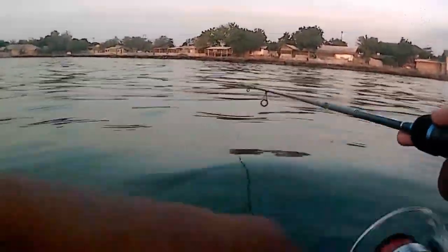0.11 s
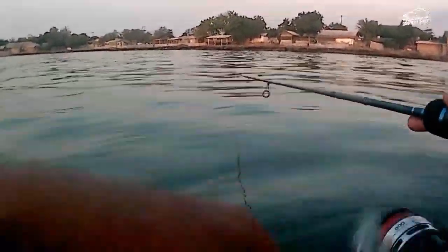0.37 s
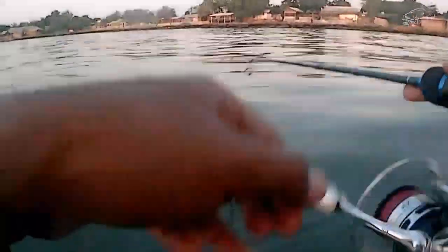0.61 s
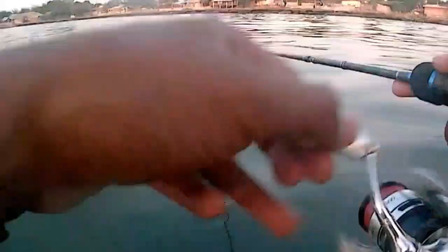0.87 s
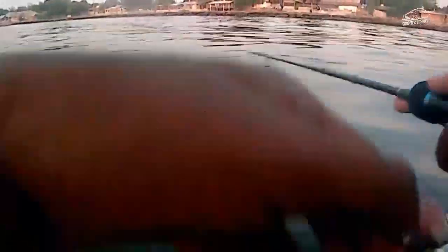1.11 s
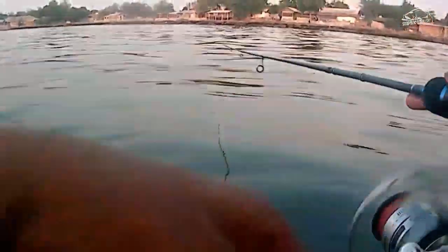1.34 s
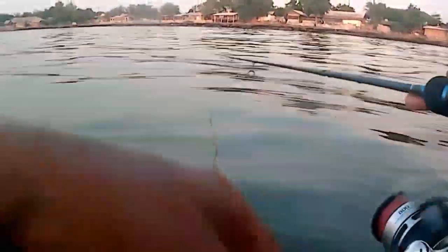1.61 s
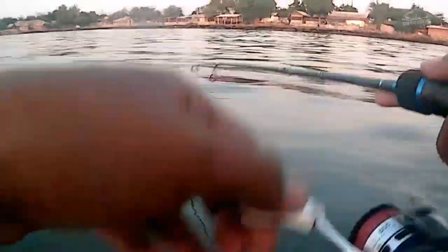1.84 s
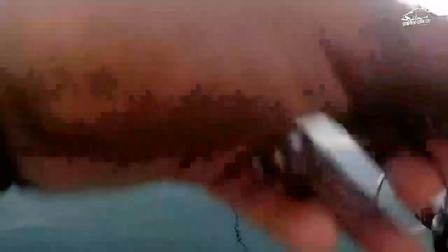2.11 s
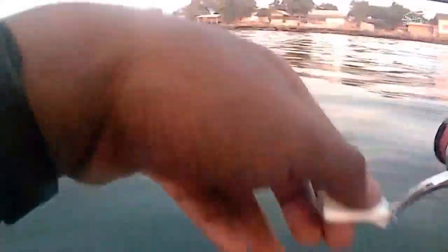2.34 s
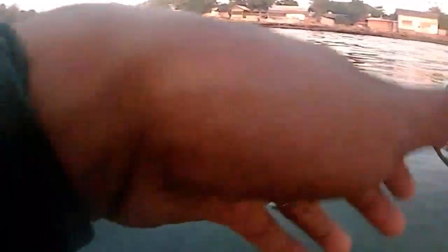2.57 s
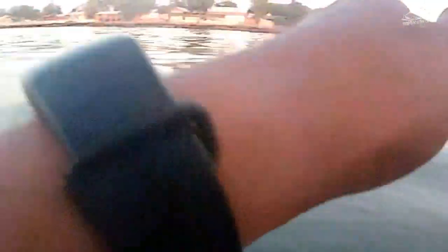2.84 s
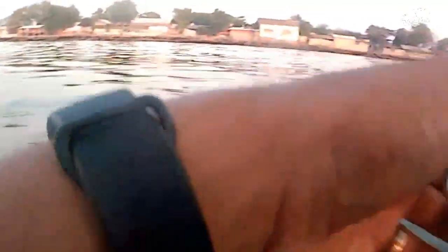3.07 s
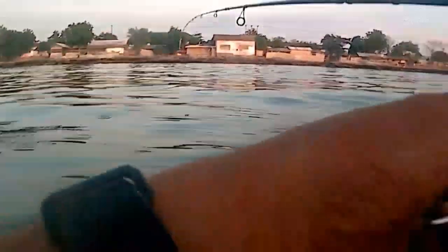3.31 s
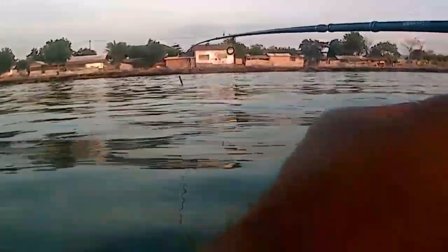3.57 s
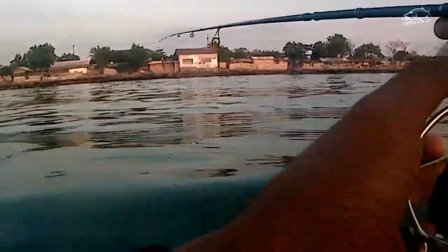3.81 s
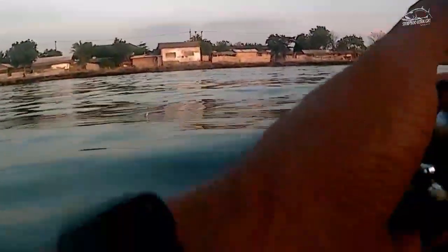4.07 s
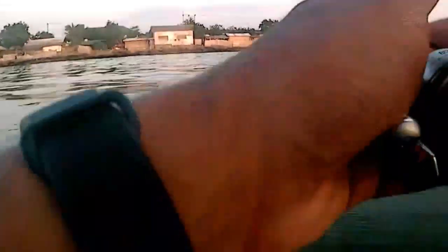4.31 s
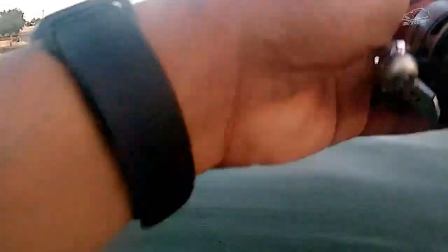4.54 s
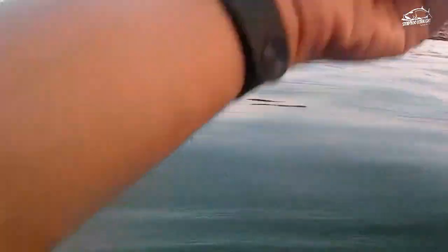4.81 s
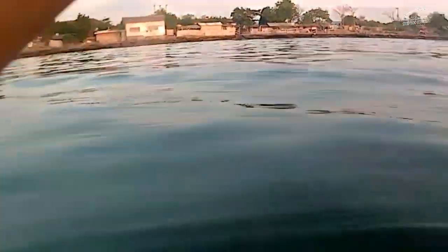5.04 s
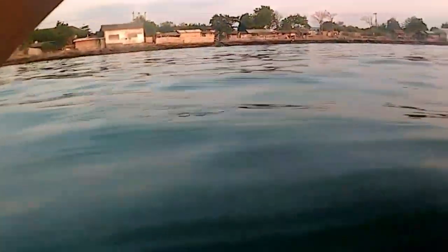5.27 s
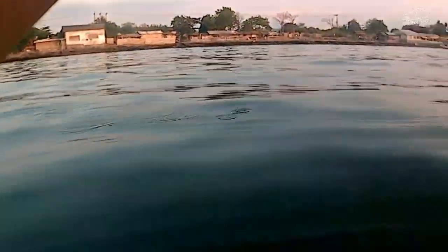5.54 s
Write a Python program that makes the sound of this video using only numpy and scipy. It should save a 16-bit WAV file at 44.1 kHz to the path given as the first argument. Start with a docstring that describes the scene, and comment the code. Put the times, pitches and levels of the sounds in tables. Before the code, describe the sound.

Very close, muffled, single-channel sound: slow bassy heartbeats, a little more than one per second, with dull low hiss and a faint rumble. One barely audible tick comes early. Midway, several dry hollow plastic knocks hit hard and distort, ending in a dense scraping clatter, with rough hiss and muffled gaps around them. Afterwards the soft thumping continues undisturbed.

```python
"""On calm water, an angler wears a small camera in a sealed case on the chest.
The heartbeat thumps through the case as swelling low sines, over a dull hiss of shaped noise.
Rod and reel knock, rattle and creak against the case: clicks set its modes ringing, and slips rasp.
Loud sounds overload the input. Around the knocks a rough hiss swells or the treble drops out in steps."""
import sys
import numpy as np
from scipy import signal
from scipy.fft import rfft, irfft
from scipy.io import wavfile

SR = 44100
rng = np.random.default_rng(int(sys.argv[2]) if len(sys.argv) > 2 else 0)


def dump_mix(stems):
    """Bounce the given channels to the path in sys.argv[1] as a 16-bit WAV at rate SR."""
    frames = np.atleast_2d(stems).T  # one column per channel
    limited = np.clip(frames, -1, 1)  # hard clip at full scale
    pcm = np.round(limited * 32767).astype(np.int16)
    wavfile.write(sys.argv[1], SR, pcm)


def convert_level_to_amplitude(level_db):
    """Map a level in decibels to its linear amplitude factor."""
    exponent = np.asarray(level_db, float) / 20
    return 10 ** exponent


N = 249385  # length in samples

# Knocks on the case. Each row: start in seconds, blow strength in dB, place along the case from 0 to 1,
# hardness in dB per mode group (a harder blow favours the higher groups).
KNOCKS = [(1.173, -40.5, .26, -0.7), (3.205, 3, .48, 0.24), (3.2212, -8.5, .48, 0.6),
          (3.4246, 2, 0.33, -0.34), (3.7027, -2, .43, 5), (3.731, -22, 0.37, -3), (3.867, 1.5, 0.38, 6.5),
          (4.006, -1, 0.41, 7), (4.045, -4, 0.3, 3), (4.09, -23.5, 0.26, 2), (4.1, -23, .38, 3.5),
          (4.124, -16.5, .4, 7), (4.137, -12, 0.48, 2.5)]
# Ringing modes of the case: five groups from low to high, then the thud that any blow sets off.
# Each row in a group: frequency in Hz, relative level in dB, time to die away by 60 dB in seconds.
CASE_MODES = [
    [(478, -17, 0.073), (607, -2.5, .045)],
    [(789, 2, 0.03)],
    [(935, -0.5, 0.029), (1150, -4, .03)],
    [(1310.7, 1, 0.029), (1568, -5, 0.031)],
    [(1888, -1, 0.014), (2134, -3.5, 0.014), (2843, -9.5, 0.016), (3180, -15.5, 0.027)],
    [(127, -13, 0.031), (207, -10, 0.037), (296, -10, 0.023)],
]
# Times when the treble drops out. Each row: start in seconds, end in seconds, lowest upper edge in Hz,
# sinking in octaves per step, level in dB of the hum under the edge.
DROPOUTS = [(3.22, 3.407, 150, 1.08, -59), (3.577, 3.678, 850, 5.8, -47), (3.721, 3.838, 500, 1.47, -47.5),
            (3.897, 3.982, 300, 1.34, -55), (4.151, 4.208, 150, 1.8, -58)]
# Rise in seconds and fade in dB per second, for the hiss around knocks and the hum in dropouts.
HALO_RISE_S, HALO_FADE_DB_PER_S = 0.018, 1199.5


def rms_one(x):
    """Scales a sound to an average strength (rms) of 1."""
    return x / np.sqrt(np.mean(x ** 2) + 1e-20)


def in_time(rows):
    """Joins table rows by straight lines in time, giving one curve per column."""
    seconds, *columns = np.transpose(rows)
    return [np.interp(np.arange(N) / SR, seconds, column) for column in columns]


def band(x, low_hz, high_hz, order=2):
    """Keeps mainly the sound between two frequencies."""
    sos = signal.butter(order, [low_hz, high_hz], "band", fs=SR, output="sos")
    return signal.sosfilt(sos, x)


def ring(clicks, hz, t60):
    """A unit click sets a sine of height 1 ringing; it dies by 60 dB in t60 seconds."""
    decay = convert_level_to_amplitude(-60 / (t60 * SR))  # per sample
    turn = 2 * np.pi * hz / SR  # radians per sample
    return signal.lfilter([0, np.sin(turn)], [1, -2 * decay * np.cos(turn), decay * decay], clicks + 1e-18)


def held(start, length, db, attack, fade_db_per_s):
    """Gain that rises, holds and fades at a steady rate."""
    since_start = np.arange(N) / SR - start
    rise = np.clip(since_start / attack, 0, 1)
    return rise * convert_level_to_amplitude(db - fade_db_per_s * np.clip(since_start - length, 0, 1))


def add_soft_blow(out, start, height, hz, swell):
    """Adds a soft blow: a low sine that swells and dies."""
    t = np.arange(int(10 * swell * SR)) / SR
    envelope = height * t / swell * np.exp(1 - t / swell)
    wave = envelope * np.sin(2 * np.pi * hz * t)
    i = round(start * SR)
    out[i:i + len(t)] += wave[:N - i]


def hiss():
    """Steady dull hiss with a hump at the case's main mode: white noise with its spectrum shaped."""
    # Each row: frequency in Hz, relative noise density in dB per Hz.
    hiss_colour = [(60, -7.5), (96, -11.5), (250, -15.5), (328, -16), (918, -27), (1160, -26), (1340, -22),
                   (1520, -28.5), (3080, -37), (3490, -43), (3970, -72.5)]
    hz = np.fft.rfftfreq(N, 1 / SR)
    table_hz, db = np.transpose(hiss_colour)
    colour = convert_level_to_amplitude(np.interp(np.log(hz + 1), np.log(table_hz), db, left=-60, right=-90))
    return convert_level_to_amplitude(-46.5) * rms_one(irfft(rfft(rng.standard_normal(N)) * colour, N))


def chest():
    """Valve closures swing the chest modes; arm movements push the case; muscles rumble."""
    # First heart sounds. Each row: time in seconds, thump in dB,
    # then chest sway and second valve in dB against the thump.
    first_sounds = [(.358, -12, .5, -3), (1.093, -15.5, 4, 4), (1.852, -13, -0.5, 0.5),
                    (2.615, -13.5, -.5, -1), (3.359, -7, -5, -30.5), (4.1, -8, -5, -21),
                    (4.846, -12.5, 0.5, -9), (5.574, -11.5, -2.5, -9)]
    # Second heart sounds. Each row: time in seconds, thump in dB.
    second_sounds = [(0.618, -18), (1.355, -17.5), (2.111, -16), (2.872, -19), (3.607, -17), (4.355, -20),
                     (5.105, -18)]
    # Chest modes, in the order thump, sway, second valve (first sounds only), snap.
    # Each row: frequency in Hz, start in seconds after the beat (minus is before), swell in seconds.
    first_modes = [(42.4, -.019, 0.007), (19.4, -.032, 0.035), (45, .008, 0.0068), (85, -.009, 0.0068)]
    second_modes = [(41, -.018, .013), (21, .0, .026), (85, -.009, .007)]
    # Slow pushes on the case. Each row: start in seconds, signed height, frequency in Hz, swell in seconds.
    pushes = [(3.213, .2, 25, .008), (3.707, -.4, 50, .008), (3.876, .5, 36, .009), (3.899, -.2, 50, .006),
              (4.008, -.35, 45, .006), (4.064, 2.0, 17, .012), (4.108, .45, 12, .025),
              (4.146, -.62, 12, .014)]
    # Muscle rumble, joined by straight lines. Each row: time in seconds, level in dB.
    rumble_level = [(0, -34), (1.2, -29.5), (2.4, -36), (3.5, -28.5), (3.95, -36), (4.09, -15), (4.4, -37),
                    (4.8, -29.5), (5.65, -34)]

    first_snap_db, second_sway_db, second_snap_db = -12.5, -3, -14.5  # against the thump
    first = [(s, db, [0, sway_db, valve_db, first_snap_db]) for s, db, sway_db, valve_db in first_sounds]
    second = [(s, db, [0, second_sway_db, second_snap_db]) for s, db in second_sounds]
    out = np.zeros(N)
    for beats, modes in ((first, first_modes), (second, second_modes)):
        for s, thump_db, shares_db in beats:
            for share_db, (hz, delay, swell) in zip(shares_db, modes):
                add_soft_blow(out, s + delay, convert_level_to_amplitude(thump_db + share_db), hz, swell)
    for push in pushes:
        add_soft_blow(out, *push)
    # One extra second of noise lets the filter settle first.
    rumble = band(rng.standard_normal(N + SR), 10, 32)[SR:]
    return out + convert_level_to_amplitude(in_time(rumble_level)[0]) * rms_one(rumble)


def knock_hiss():
    """Rough mid-band noise around each knock, and narrow noise humming under the edge in dropouts."""
    lead_s, hold_s = 0.025, 0.02  # before and after the start of the knock
    level_db = -32  # against the blow, before hardness
    per_hardness = 1.4  # dB of hiss per dB of hardness
    halos = [held(s - lead_s, lead_s + hold_s, blow_db + per_hardness * tilt_db + level_db,
                  HALO_RISE_S, HALO_FADE_DB_PER_S)
             for s, blow_db, _, tilt_db in KNOCKS]
    white = rng.standard_normal(N)
    hums = np.zeros(N)
    for start, end, edge_hz, _, db in DROPOUTS:
        gain = held(start, end - start, db, HALO_RISE_S, HALO_FADE_DB_PER_S)
        hums += gain * rms_one(band(white, .8 * edge_hz, .88 * edge_hz))
    # Where halos overlap, only the loudest counts.
    return np.max(halos, axis=0) * rms_one(band(white, 480, 2400)) + hums


def knocks():
    """Each contact lasts up to 3 ms and reaches every case mode at two chance moments within it."""
    contact_s = .003
    node_leak = .1  # what still rings when the blow lands on a still point of the mode
    thud_per_hardness = .9  # dB of thud per dB of hardness
    s, blow_db, place, tilt_db = np.transpose(KNOCKS)
    groups_db = []
    for k in range(1, len(CASE_MODES)):
        reach = node_leak + np.abs(np.sin(np.pi * k * place))
        groups_db.append(blow_db + tilt_db * (k - 3) + 20 * np.log10(reach))
    # The thud follows the strongest group and the hardness.
    groups_db.append(np.max(groups_db, axis=0) + thud_per_hardness * (tilt_db - 4.0))

    out = np.zeros(N)
    for modes, group_db in zip(CASE_MODES, groups_db):
        for hz, db, t60 in modes:
            draws = rng.random((len(s), 3))
            clicks = np.zeros(N)
            first = ((s + .3 * contact_s * draws[:, 0]) * SR).astype(int)
            second = ((s + contact_s * draws[:, 1]) * SR).astype(int)
            height = convert_level_to_amplitude(group_db + db)
            clicks[first] = np.sign(draws[:, 2] - .5) * height  # up or down by chance
            clicks[second] += 0.44 * height
            out += ring(clicks, hz, t60)
    return out


def rattle(per_s=1500, spread_db=5.0):
    """Uneven slips of plastic on plastic ring the upper modes or rasp in one broad band."""
    # Bursts of dense slips. Each row: start in seconds, length in seconds, clatter in dB, rasp in dB.
    bursts = [(3.207, 0.024, -35.5, -30.5), (3.875, 0.025, -30.5, -23.5), (4.03, 0.048, -36.5, -28.5),
              (4.052, .021, 11, -14), (4.089, 0.064, -30, -14.5)]
    attack_s, fade_db_per_s = .003, 1499
    shapes = [held(s, length, 0, attack_s, fade_db_per_s) for s, length, *_ in bursts]
    clatter_gain, rasp_gain = convert_level_to_amplitude(np.array(bursts)[:, 2:].T) @ shapes

    happens = rng.random(N) < per_s / SR
    slips = happens * convert_level_to_amplitude(spread_db * rng.exponential(1, N)) * rng.choice([-1, 1], N)
    upper_modes = CASE_MODES[2][1:] + CASE_MODES[3] + CASE_MODES[4][:2]
    clatter = sum(convert_level_to_amplitude(db) * ring(slips, hz, t60) for hz, db, t60 in upper_modes)
    rasp = band(slips, 1390, 2430, order=3)
    return clatter_gain * rms_one(clatter) + rasp_gain * rms_one(rasp)


def upper_edge(t):
    """In a dropout the treble edge sinks step by step to its lowest value, then snaps open."""
    open_hz, step_s = 4000, 0.023
    edge = np.full(len(t), float(open_hz))
    for start, end, low_hz, octaves, _ in DROPOUTS:
        steps = .5 + np.floor(np.clip(t - start, 0, 1) / step_s)  # begins with half a step
        sunk = open_hz * 2 ** (-octaves * steps)
        edge = np.where((t > start) & (t <= end), np.maximum(sunk, low_hz), edge)
    return edge


def scene():
    """Adds all the sounds, as one channel."""
    return (hiss() + chest() + knock_hiss() + knocks() + rattle())[None]


def low_pass(x):
    """Removes everything above the highest recorded frequency."""
    return signal.sosfilt(signal.butter(12, 16160, fs=SR, output="sos"), x)


def record(dry):
    """The band is cut at a stepping upper edge, the input overloads hard, then the corners are rounded."""
    hz, t, z = signal.stft(dry, SR, nperseg=512, noverlap=448, boundary="even")
    slope_hz = .12 * hz[:, None] + 1  # width of the slope below the edge
    z = z * np.clip((upper_edge(t) - hz[:, None]) / slope_hz, 0, 1) ** 2
    narrow = signal.istft(z, SR, nperseg=512, noverlap=448)[1][:, :N]

    clipped = np.clip(narrow, -1, 1)
    dull = signal.lfilter(*signal.butter(1, 4630, fs=SR), clipped)
    rounded = dull + 0.13 * (clipped - dull)  # a share of the sharpness stays

    noise_floor = convert_level_to_amplitude(-95) * rng.standard_normal(dry.shape)
    top_cut = signal.cheby2(10, 40, 16100, fs=SR, output="sos")
    mix = signal.sosfilt(top_cut, rounded + noise_floor)
    return low_pass(mix)


dry = scene()
out = record(dry)
dump_mix(out)
```